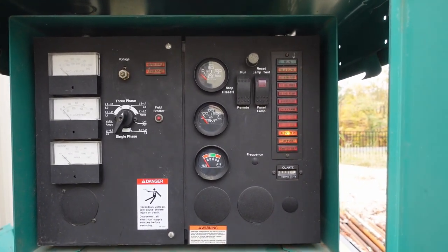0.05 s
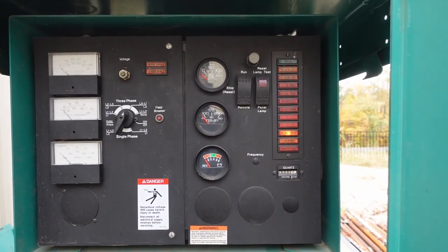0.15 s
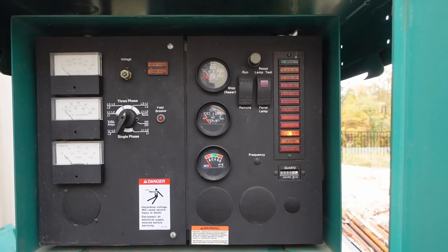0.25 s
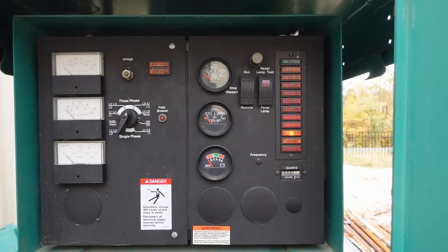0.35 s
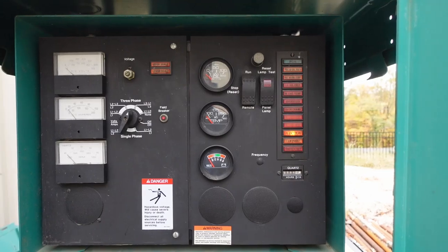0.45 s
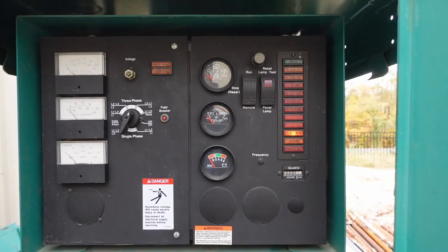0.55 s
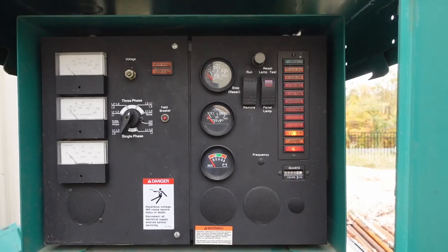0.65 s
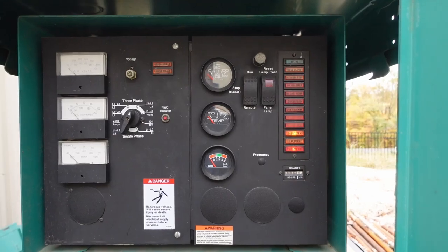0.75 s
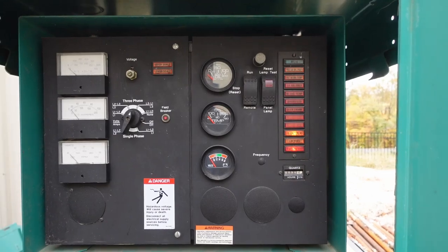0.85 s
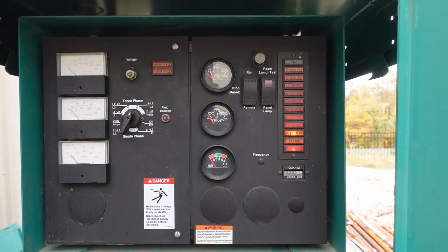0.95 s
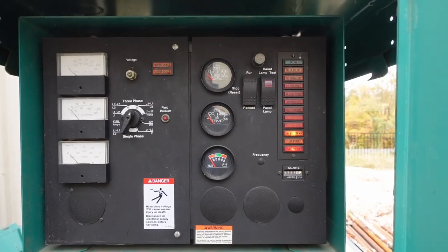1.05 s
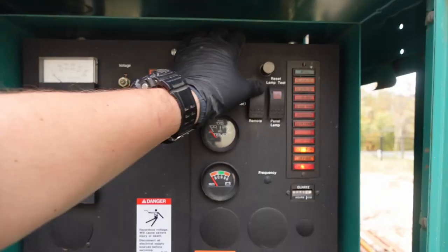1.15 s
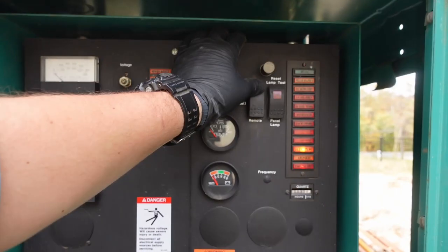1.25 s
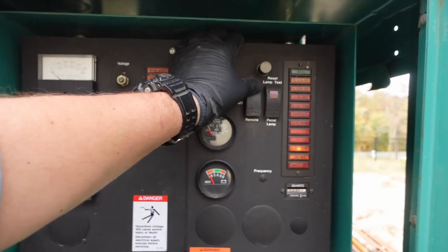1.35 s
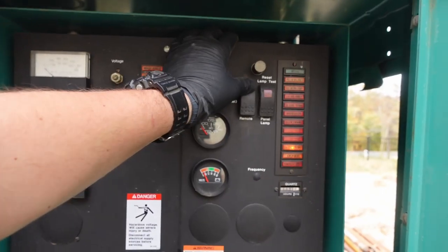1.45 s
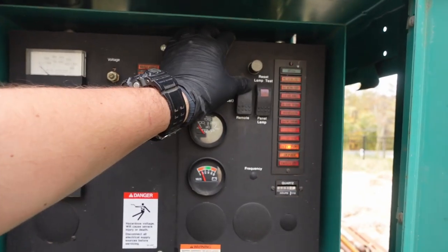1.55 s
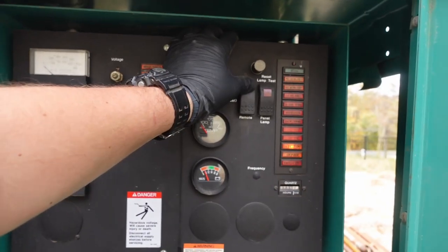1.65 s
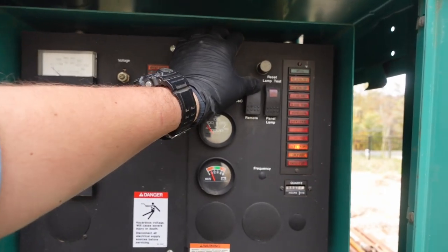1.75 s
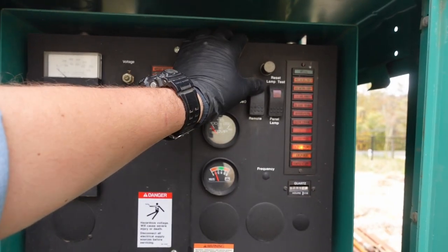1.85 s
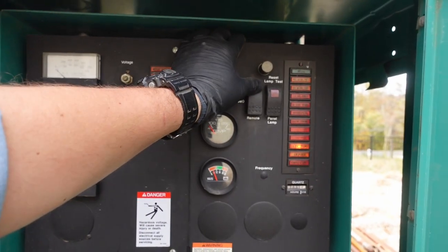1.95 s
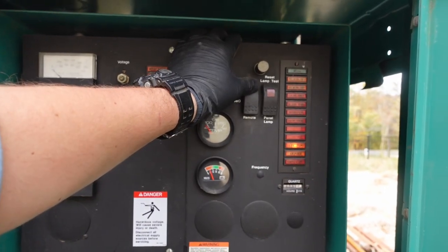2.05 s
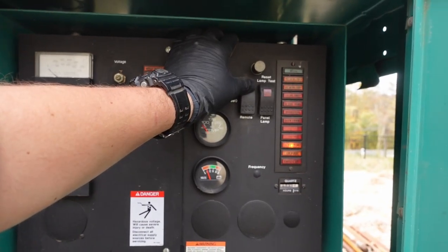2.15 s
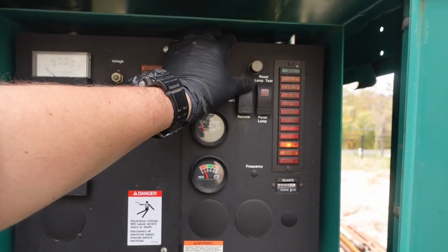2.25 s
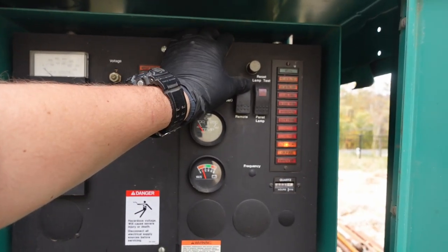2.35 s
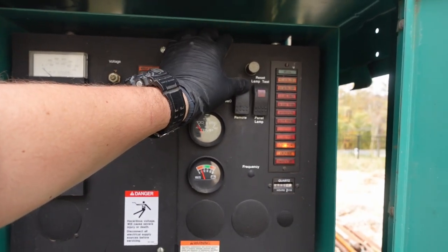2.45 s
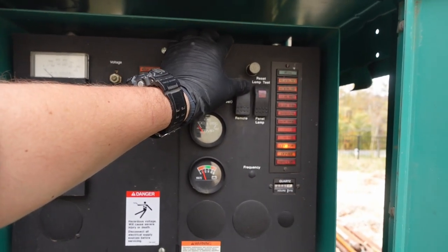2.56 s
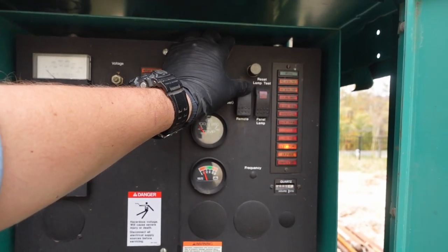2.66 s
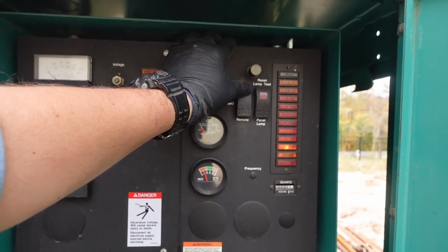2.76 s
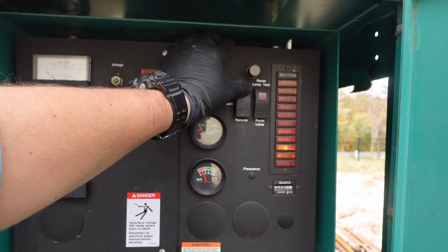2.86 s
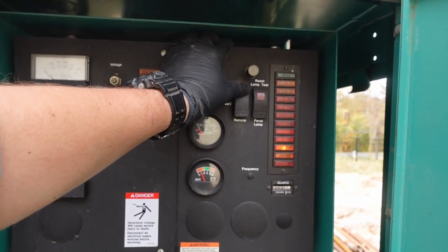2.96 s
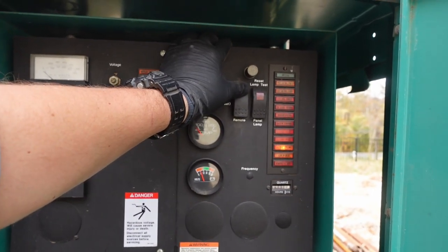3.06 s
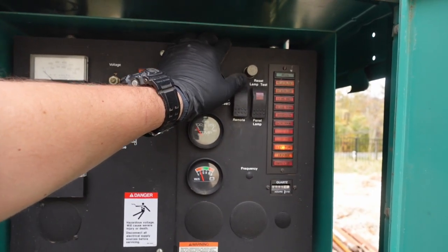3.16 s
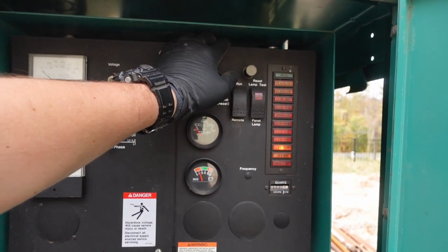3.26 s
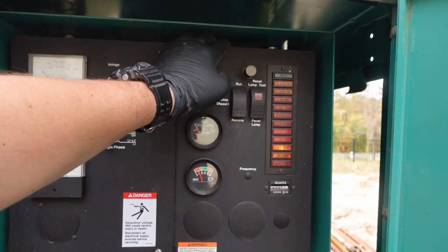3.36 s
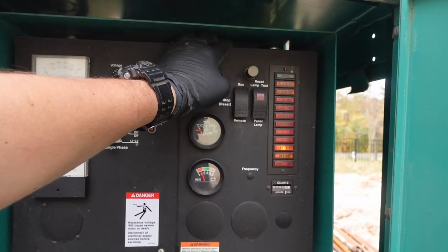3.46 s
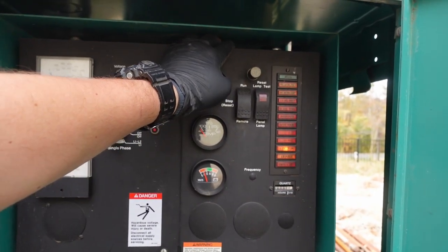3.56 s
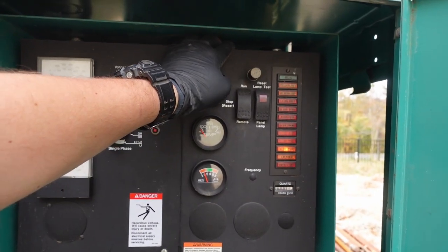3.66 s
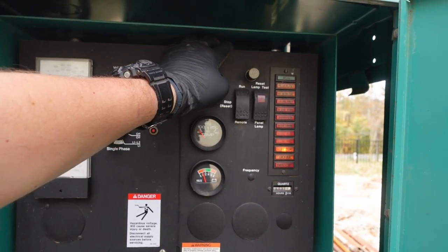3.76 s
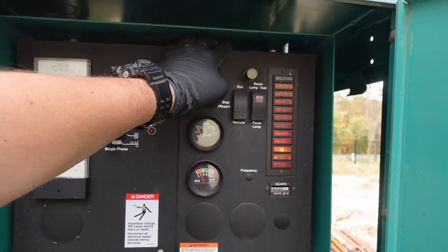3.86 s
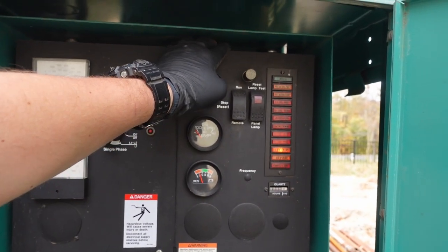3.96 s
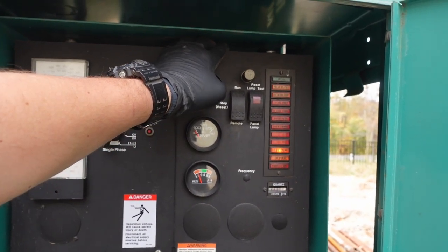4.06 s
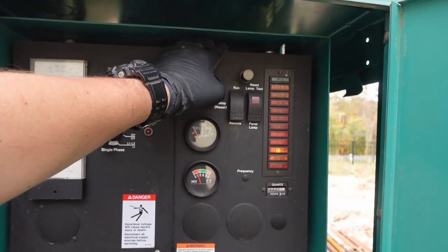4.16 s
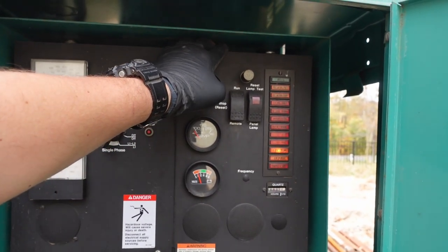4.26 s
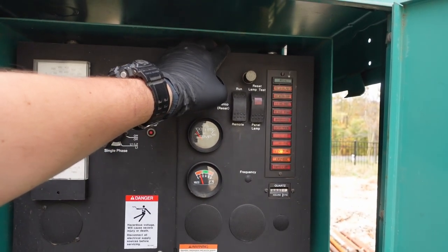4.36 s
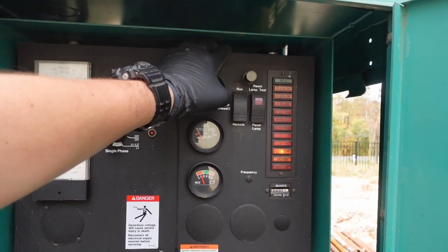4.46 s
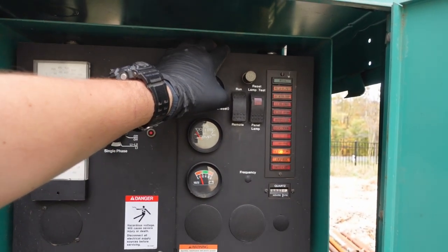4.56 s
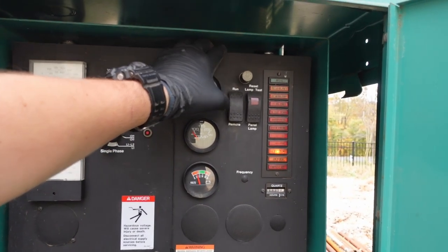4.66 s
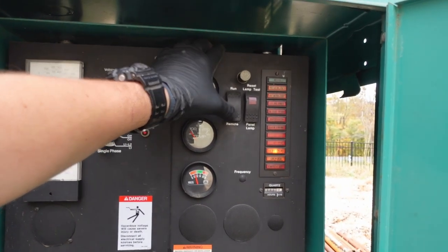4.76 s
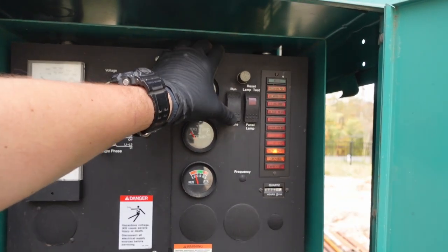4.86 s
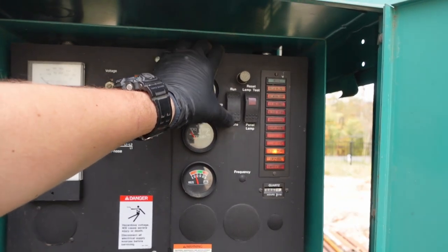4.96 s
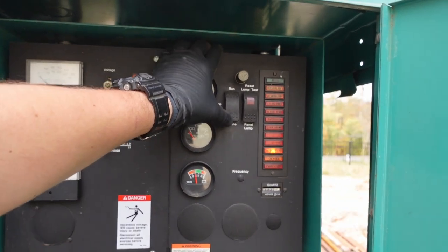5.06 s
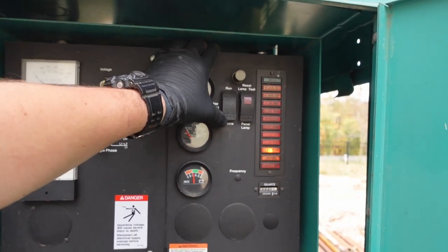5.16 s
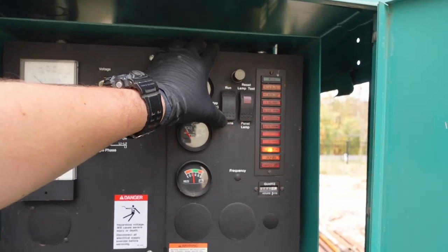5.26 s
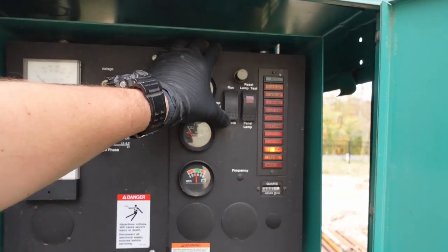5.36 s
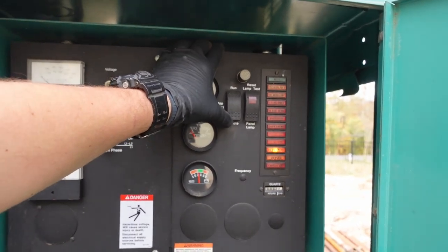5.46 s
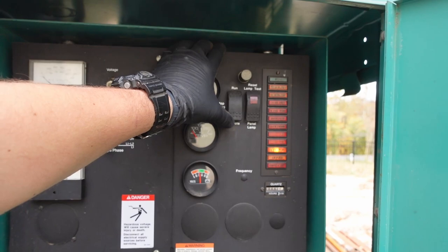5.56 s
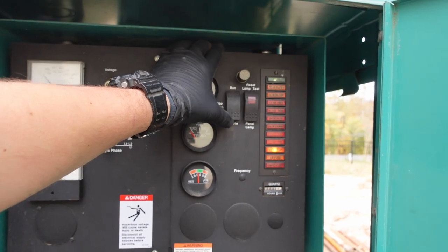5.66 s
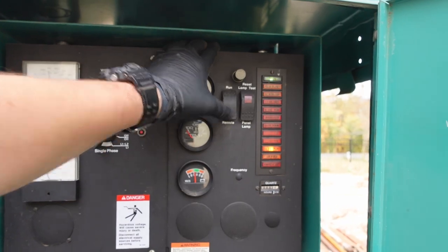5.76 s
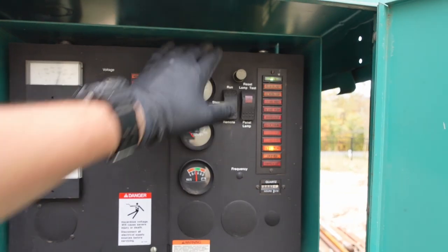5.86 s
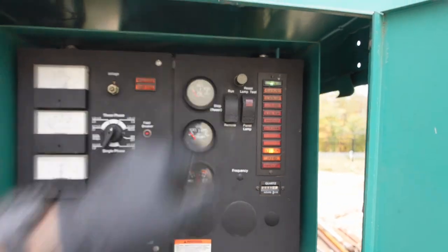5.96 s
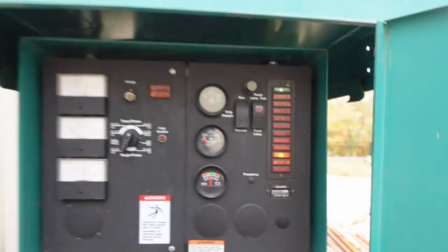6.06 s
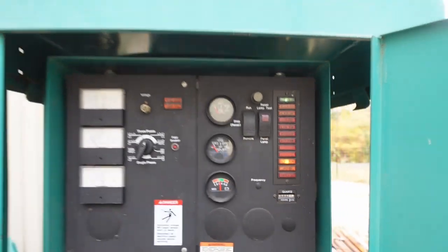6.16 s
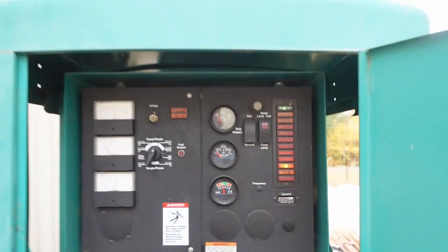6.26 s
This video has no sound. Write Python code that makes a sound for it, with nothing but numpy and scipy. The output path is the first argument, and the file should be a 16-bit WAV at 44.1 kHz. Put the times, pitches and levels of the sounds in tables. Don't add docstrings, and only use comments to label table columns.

```python
import sys
import numpy as np
from scipy import signal
from scipy.io import wavfile
from scipy.ndimage import uniform_filter1d

SR = 44100
rng = np.random.default_rng(int(sys.argv[2]) if len(sys.argv) > 2 else 0)


def put_to_file(sound):
    columns = np.atleast_2d(sound).T
    safe = np.clip(columns, -1, 1)
    whole_steps = np.round(safe * 32767)
    wavfile.write(sys.argv[1], SR, whole_steps.astype(np.int16))


def attenuation_scalar(level_db):
    decades = np.asarray(level_db, float) / 20
    return 10 ** decades


N = 278659
TIME = np.arange(N) / SR

# start_s, push_db, rise_s
STROKES = [(1.386, -37, 0.01), (1.504, -27, .12), (1.781, -22.5, 0.052), (1.96, -21, 0.019),
           (2.119, -19.5, 0.0091), (2.257, -20, .015), (2.396, -19.5, 0.0088), (2.533, -19, 0.013),
           (2.675, -20, 0.014), (2.816, -20, .005), (2.95, -19, 0.015), (3.09, -18.5, .012),
           (3.219, -20, 0.0082), (3.359, -19, .011), (3.493, -19.5, 0.015), (3.634, -20, 0.0098),
           (3.768, -20, 0.014), (3.905, -19.5, .012), (4.04, -20.5, .011), (4.17, -19.5, 0.011),
           (4.301, -19, 0.012)]
# start_s, entering_compression_hz, at_its_top_hz
CRANKING = [
    (1.5, 968, 1327),
    (1.78, 1540, 1376),
    (1.96, 1697, 1470),
    (2.12, 1828, 1501),
    (4.3, 1850, 1574),
]
# freq_hz, density_db (per Hz)
COAST_COLOUR = [(71, -37.5), (120, -7), (314, -4.5), (788, -3), (1240, 0), (1650, -9.5), (2240, -10.5),
                (2740, -13), (6480, -22), (7480, -28.5), (9560, -31), (15900, -50.5)]
# freq_hz, density_db (per Hz)
PUSH_COLOUR = [(71, -33), (120, -20), (208, -2), (463, -5.5), (838, -3), (1260, 2), (1490, -8),
               (1680, -13.5), (2100, -4.5), (3300, -13.5), (3810, -12.5), (9560, -26.5), (15900, -50)]
# freq_hz, density_db (per Hz)
FREE_COLOUR = [(180, -43), (300, -8), (348, -14), (712, -7.5), (1230, -3.5), (1750, -15.5), (2280, -8),
               (2650, -14.5), (6500, -17.5), (9520, -25), (15900, -45)]
# freq_hz, width_hz, lift_db
HOUSING = [(213.7, 27, 5.5), (268, 23.6, 10.5), (468, 30, 5), (616, 11, 8), (1547, 17, -26),
           (1950, 20, 5.5), (2260, 25, 7.5), (941, 18, 8), (1027, 18, 8), (1123, 16, 11), (1256, 32, 11),
           (1681, 28, 8), (1860, 35, 8), (2220, 47, 0.5), (2510, 49, 7), (3350, 55, 5), (4315, 25, 9.5),
           (4960, 280, 3.5), (6270, 32, 9.5), (6600, 38, 7.5), (9300, 300, 4.5)]
# freq_hz, width_hz, lift_db
LOADED_PARTS = [(240, 18, 1), (458, 66, 12), (535, 20, 6), (1000, 134, 7)]
# pitch_hz, pitch_shake_hz, level_db (re coasting)
SINGING_PANELS = [(269.2, 5.8, -17.5), (1132, 10, -14), (1251, 19.3, -10)]
# freq_hz, width_hz, lift_db
HUM_PANELS = [(210, 27, 13), (270, 45, 19)]
# freq_hz, density_db (per Hz)
ROCK_COLOUR = [(18, -67), (30, -39), (38, -37), (59, -10), (91, -7), (118, -6.5), (167, -11), (200, 10.5),
               (260, -43), (440, -120)]

# start_s, firings_hz, effort_db
RUN_UP = [
    (5.0, 32, -25),
    (5.1, 34.6, -25.5),
    (5.3, 49.7, -20),
    (5.45, 64, -19),
    (5.66, 71.4, -16),
    (5.95, 78.5, -12),
    (6.08, 81, -14),
    (6.16, 85, -12.5),
    (6.32, 79.6, -12.5),
]
# freq_hz, width_hz, lift_db
INTAKE = [(163, 33, 4.5), (292.6, 34, 5.5), (423, 38, 5), (553, 55, 4)]
# freq_hz, density_db (per Hz)
ROAR_COLOUR = [(24, -65), (40, -42), (67, -30), (107, -18), (180, -7), (240, -5.5), (297, -4.5),
               (381, -9.5), (428, -6.5), (499, -11), (1120, -16), (4000, -38.5), (5200, -54), (8800, -120)]
# freq_hz, density_db (per Hz)
HISS_COLOUR = [(1180, -26.5), (2000, 1), (4180, -10.5), (5820, -7.5), (7420, -10.5), (7890, -11.5),
               (8600, -10.5), (9720, -17.5), (10900, -25.5), (15100, -33), (15900, -28)]
VALVES_HZ = [4900, 5000, 5730, 5640, 6300, 6800, 7240, 7400, 8400, 8770, 8100, 8900]

# start_s, level_db, ring_hz, ring_width_hz, t60_s
HITS = [(.614, -52, 3000, 900, 0.054), (.62, -58, 4800, 1500, .09), (.622, -60, 9000, 2500, .1),
        (1.2961, -23, 3370, 500, 0.042), (1.297, -33.5, 8900, 3000, 0.08), (1.328, -24.5, 5500, 2600, .3),
        (1.345, -14, 2300, 2500, 0.17), (1.3651, -6, 1000, 497, .12), (1.364, -22, 6500, 7000, 0.081),
        (1.378, -13.5, 507, 597, 0.18), (1.39, -18, 270, 60, 0.83), (1.4, -14.5, 2050, 300, .12)]
# freq_hz, density_db (per Hz)
KNOCK_COLOUR = [(59, -47), (100, 2), (1010, 0), (2120, 3.5), (2310, 4), (2860, -8), (8260, -29),
                (15900, -46)]
# freq_hz, density_db (per Hz)
PUMP_COLOUR = [(88, -53), (150, -17), (533, -7.5), (777, -11), (1090, -7), (2290, -30), (2580, -30),
               (9000, -48), (11700, -78), (19800, -120)]
# freq_hz, density_db (per Hz)
TRAFFIC_COLOUR = [(40, -26), (132, -5), (200, -13), (520, -13), (813, -3), (1710, -11), (3600, -33),
                  (15600, -47)]

ENGAGE_S, CATCH_S, RELEASE_S, STOP_S = 1.355, 4.36, 5.05, 5.8
FULL_HZ = 83


def starter():
    load, bite, slack_db, teeth_hz = np.zeros(N), np.zeros(N), np.zeros(N), np.full(N, 1700.)
    starts = np.transpose(STROKES)[0]
    gaps = np.diff(starts, append=starts[-1] + .131)
    speeds = curve(CRANKING)
    for (s, db, rise), gap in zip(STROKES, gaps):
        t = TIME - s
        length = gap - .054
        rise = min(rise, .44 * length)
        start_hz, end_hz = (hz[round(s * SR)] for hz in speeds)
        load += attenuation_scalar(db) * np.interp(t, [0, rise, .5 * length, length, length + 0.021],
                                    [0, 0.92, 1, 0.67, 0.0071])
        bite += attenuation_scalar(db) * np.interp(t, [0, rise, .45 * length, length, length + .02], [0, 1.1, .95, .45, 0])
        slack_db += np.interp(t, [-.045, -.012, 0, .01], [0, -2.5, -2.5, 0]) * (s > 1.7)
        on = (t > 0) & (t < length + .04)
        teeth_hz[on] = end_hz + (start_hz - end_hz) * np.exp(-t[on] / (0.54 * length))
    grind = coasting_grind()
    return pushing(load, bite, teeth_hz) + coasting(grind, load, slack_db) + rocking()


def pushing(load, bite, teeth_hz):
    whine = attenuation_scalar(-4.5) * wobbling(teeth_hz, 90) + attenuation_scalar(-7) * wobbling(1.96 * teeth_hz, 135)
    stiff_db = 1 * np.exp(-since(CRANKING[0][0] + .15) / 0.33)
    return colour(load * rattle(1.53, size=150) + bite * whine * attenuation_scalar(stiff_db), PUSH_COLOUR,
                  HOUSING + LOADED_PARTS)


def coasting_grind():
    coast_db, settle_db, settle_s = -23.5, 3, .4
    unload_db, recover_s, rundown_s, rundown_db_per_s = -3, 0.57, 5.3, -17
    db = coast_db + settle_db * np.exp(-since(ENGAGE_S) / settle_s) + rundown_db_per_s * since(rundown_s)
    unloaded = (TIME > CATCH_S) * np.exp(-since(CATCH_S) / recover_s)
    db += unload_db * uniform_filter1d(unloaded, size=3000)
    return attenuation_scalar(db) * gate(ENGAGE_S, STOP_S, .012)


def coasting(grind, load, slack_db):
    contact = grind * attenuation_scalar(slack_db)
    noise = colour(contact * rattle(0.66, size=300), COAST_COLOUR, HOUSING)
    panels = sum(attenuation_scalar(db) * wobbling(hz, shake_hz) for hz, shake_hz, db in SINGING_PANELS)
    return noise + (0.81 * contact + 0.3 * load) * panels


def rocking():
    rock_db, jolt_db, jolt_t60_s, release_db = -47, -31, 1.3, -36.5
    strength = attenuation_scalar(rock_db) + attenuation_scalar(jolt_db - 60 * since(ENGAGE_S + .04) / jolt_t60_s)
    strength = strength + attenuation_scalar(release_db) * gate(RELEASE_S + .06, 9, .15)
    strength = strength * gate(ENGAGE_S + 0.034, RELEASE_S + .15, .06)
    return strength * colour(rattle(2.7, size=3000), ROCK_COLOUR)


def overrun():
    free_hz, loaded_hz, spin_up_s = 274, 199, .26
    hum_db, hum_climb_db_per_s, hum_fall_db_per_s = -50, 9.5, -72
    brush_db, brush_climb_db_per_s, brush_fall_db_per_s = -39.5, 14.5, -150
    hz = free_hz - (free_hz - loaded_hz) * np.exp(-since(CATCH_S) / spin_up_s)
    powered_s, after_s = np.minimum(since(CATCH_S), RELEASE_S - CATCH_S), since(RELEASE_S)
    turns = 2 * np.pi * np.cumsum(hz) / SR
    blur = wobbling(2 * hz, 6.4)
    db = hum_db + hum_climb_db_per_s * powered_s + hum_fall_db_per_s * after_s
    db = db + sum(lift_db / (1 + (2 * (hz - c) / w) ** 2) for c, w, lift_db in HUM_PANELS)
    hum = attenuation_scalar(db) * (np.sqrt(2) * np.sin(turns) + attenuation_scalar(-13) * blur) * gate(CATCH_S, STOP_S, .035)
    brush_tone = attenuation_scalar(-34.5) * gate(4.58, 4.95, 0.059) * wobbling(3 * hz, 8.6)
    spin = attenuation_scalar(brush_db + brush_climb_db_per_s * powered_s + brush_fall_db_per_s * after_s)
    spin = spin * gate(CATCH_S, STOP_S, .02)
    brushes = attenuation_scalar(8.5) * colour(spin * rattle(0.96, size=200), FREE_COLOUR, HOUSING)
    return hum + brush_tone + brushes


def engine():
    blades_per_firing, uneven_hz = 11 / 3, 1.6
    hz, roar_db = curve(RUN_UP)
    hiss_db = -31.5 + 0.23 * (hz - FULL_HZ) + 26 * since(6.157)
    firing_db = -37 - .7 * np.maximum(70 - hz, 0)
    double_db = roar_db - 13 - 2.5 * np.maximum(48 - hz, 0)
    blade_db = roar_db + np.maximum(-5 + 0.9 * (hz - FULL_HZ), -15.5)
    fade = gate(RUN_UP[0][0] + 0.032, 9, 0.14)
    turns = np.cumsum(hz + uneven_hz * evened(signal.resample(rng.standard_normal(300), N))) / SR

    waver_db = 2.5 * evened(signal.resample(rng.standard_normal((3, 120)), N, axis=1))
    tones_db = np.array([firing_db, double_db, blade_db]) + waver_db + 3
    tone = (attenuation_scalar(tones_db) * np.sin(2 * np.pi * turns * [[1], [2], [blades_per_firing]])).sum(0)

    strength = attenuation_scalar(2.0 * rng.standard_normal(1000))[turns.astype(int)]
    puff = np.exp(-(turns % 1) / .5) * strength
    thumps = evened((np.diff(np.floor(turns), prepend=0) > 0) * strength)
    drive = 0.2 * thumps + evened((2.5 + puff) * rattle(0.55, size=2000, patchy_db=0.8))
    roar = colour(attenuation_scalar(roar_db) * evened(drive) * fade, ROAR_COLOUR, INTAKE)
    hiss = colour(evened((2.9 + puff) * rattle(1.0, size=2500, patchy_db=1.0)), HISS_COLOUR)
    hiss = hiss + attenuation_scalar(-9.5) * valve_gear() + turbo(hz)
    return (tone + attenuation_scalar(hiss_db + 3.0) * hiss) * fade + roar


def valve_gear():
    t = np.arange(2500) / SR
    shape = (len(VALVES_HZ), N)
    taps = (rng.random(shape) < 35 / SR) * attenuation_scalar(3.4 * rng.standard_normal(shape))
    decay = attenuation_scalar(-60 * t / 0.094) * np.minimum(t / 0.0025, 1)
    rings = [np.sin(2 * np.pi * hz * t) * decay for hz in VALVES_HZ]
    return evened(signal.oaconvolve(taps, rings, axes=1)[:, :N].sum(0))


def turbo(firing_hz):
    hz = 9430 + 22 * (firing_hz - FULL_HZ)
    air = rattle(4, size=500, patchy_db=4.5, fine_db=3)
    return attenuation_scalar(-13) * ringing(air, hz, 650)


def hits():
    out, t = np.zeros(N), np.arange(24000) / SR
    ring_share = 0.61
    for s, db, hz, width, t60 in HITS:
        burst = rng.standard_normal(len(t))
        tone = ring_share * ringing(burst, hz, width) + (1 - ring_share) * colour(burst, KNOCK_COLOUR)
        decay = attenuation_scalar(db - 60 * t / t60) * np.minimum(t / 0.00059, 1)
        out[round(s * SR):][:len(t)] += decay * tone
    return out


def belt():
    squeal_db, fade_db_per_s = -53, -9
    slip = attenuation_scalar(squeal_db + fade_db_per_s * since(RELEASE_S)) * gate(RELEASE_S + .07, 9, .1)
    return slip * ringing(rattle(1.5, size=500), 11200, 1800)


def fuel_pump():
    on_s, off_s, start_db, climb_db_per_s = 1.13, 1.4, -52, 10
    priming = attenuation_scalar(start_db + climb_db_per_s * since(on_s)) * gate(on_s, off_s, .02)
    return priming * colour(rattle(1.8, size=300), PUMP_COLOUR)


def far_traffic():
    return attenuation_scalar(-55) * colour(rattle(0.53, size=3000, patchy_db=0.9, fine_db=0.5), TRAFFIC_COLOUR)


def rattle(flicker_db, size, patchy_db=1.5, fine_db=1.5):
    flicker = evened(uniform_filter1d(rng.standard_normal(N), size=size))
    return evened(clumped(rng.standard_normal(N), patchy_db, fine_db) * attenuation_scalar(flicker_db * flicker))


def clumped(x, patchy_db, fine_db):
    z = signal.stft(x, nperseg=1024, noverlap=768)[2]
    patches = uniform_filter1d(rng.standard_normal(z.shape), size=7, axis=0)
    patches = uniform_filter1d(patches, size=5, axis=1)
    rings = uniform_filter1d(rng.standard_normal(z.shape), size=60, axis=1)
    field = attenuation_scalar(patchy_db * evened(patches) + fine_db * evened(rings))
    return signal.istft(z * evened(field), nperseg=1024, noverlap=768)[1][:N]


def wobbling(hz, spread_hz):
    shake = evened(uniform_filter1d(rng.standard_normal(N), size=120))
    tone = np.sqrt(2) * np.sin(2 * np.pi * np.cumsum(hz + spread_hz * shake) / SR)
    return evened(tone + ringing(rng.standard_normal(N), hz, 3.3 * spread_hz))


def ringing(x, hz, width):
    return evened(resonate(resonate(x, hz, width), hz, width))


def resonate(x, hz, width):
    turn = np.exp(2j * np.pi * np.cumsum(hz * np.ones(len(x))) / SR)
    r = np.exp(-np.pi * width / SR)
    return 2 * (turn * signal.lfilter([1 - r], [1, -r], x / turn)).real


def colour(x, spectrum, modes=()):
    size = 16384
    hz = abs(np.fft.fftfreq(size, 1 / SR))
    f, db = np.transpose(spectrum)
    lift = 1 + sum((attenuation_scalar(2 * up) - 1) / (1 + (2 * (hz - c) / w) ** 2) ** 2 for c, w, up in modes)
    base_db = np.maximum(np.interp(np.log(hz + 1), np.log(f + 1), db), -100)
    log_gain = np.log(attenuation_scalar(base_db) * np.sqrt(lift))
    taps = np.fft.ifft(np.exp(np.conj(signal.hilbert(log_gain)))).real[:size // 2]
    return signal.oaconvolve(x, taps / np.linalg.norm(taps))[:len(x)]


def evened(x):
    return x / np.sqrt(np.mean(x ** 2) + 1e-20)


def curve(rows):
    s, *columns = np.transpose(rows)
    return [np.interp(TIME, s, c) for c in columns]


def gate(on_s, off_s, edge_s):
    return np.clip((TIME - on_s) / edge_s + .5, 0, 1) * np.clip((off_s - TIME) / edge_s + .5, 0, 1)


def since(s):
    return np.maximum(TIME - s, 0)


def scene():
    machine = starter() + overrun() + engine() + hits() + belt()
    return (machine + fuel_pump() + far_traffic())[None]


def roll_off(x):
    return signal.sosfilt(signal.butter(12, 16090, fs=SR, output="sos"), x)


def record(dry):
    rounded = 0.89 * np.tanh(dry / 0.91)
    thin = signal.sosfilt(signal.butter(3, 55, "high", fs=SR, output="sos"), rounded)
    edge = signal.firwin(1501, 15690, window=("kaiser", 9), fs=SR)
    return roll_off(signal.oaconvolve(thin, edge[None], "same"))


dry = scene()
out = record(dry)
put_to_file(out)
```